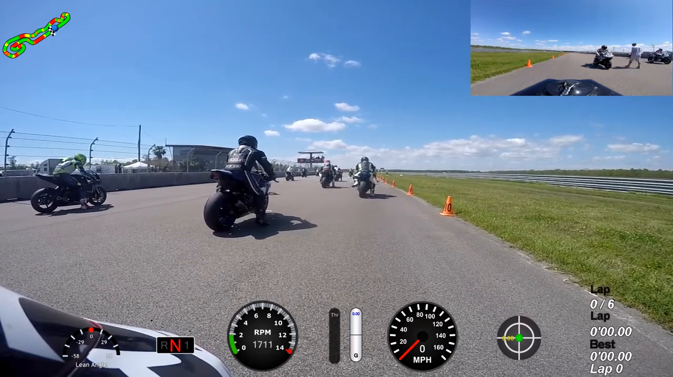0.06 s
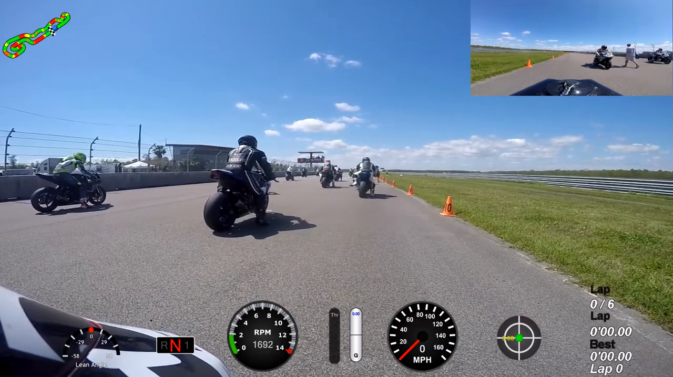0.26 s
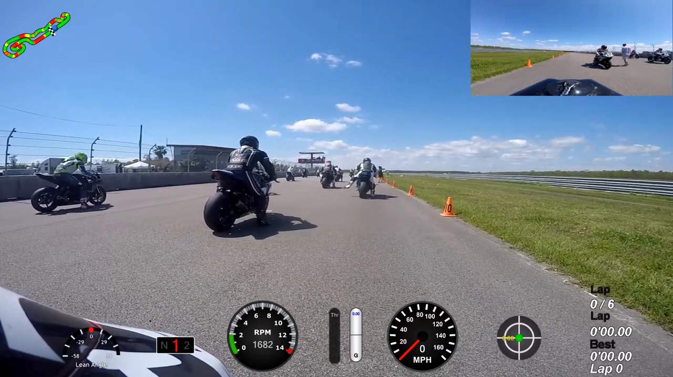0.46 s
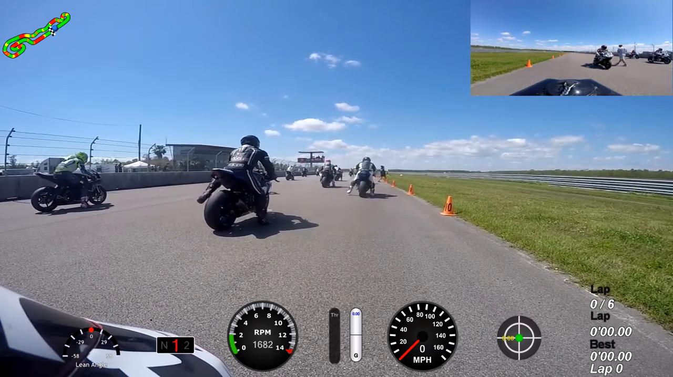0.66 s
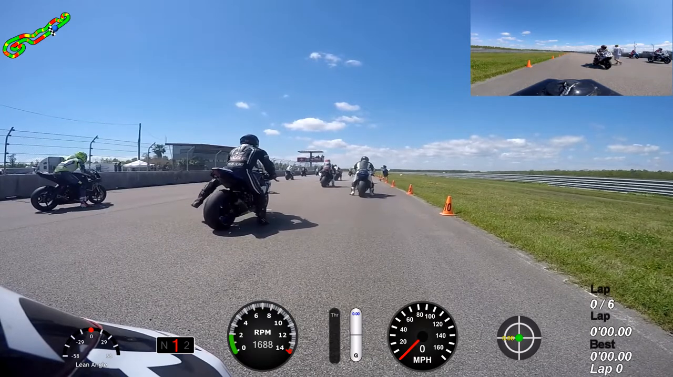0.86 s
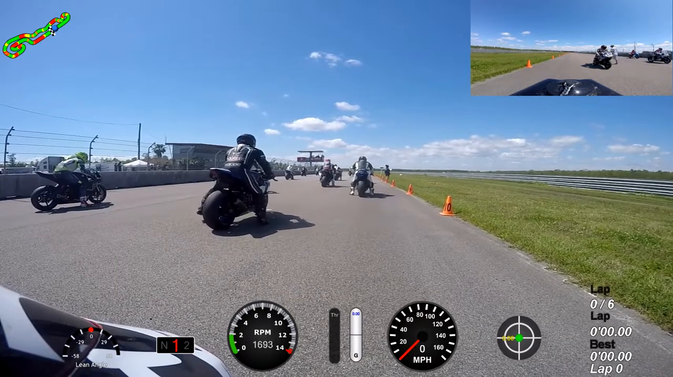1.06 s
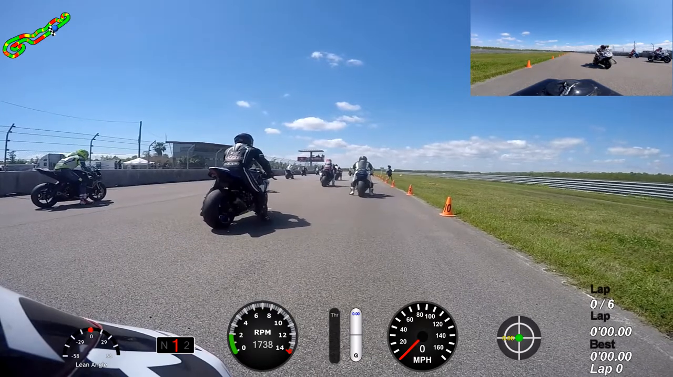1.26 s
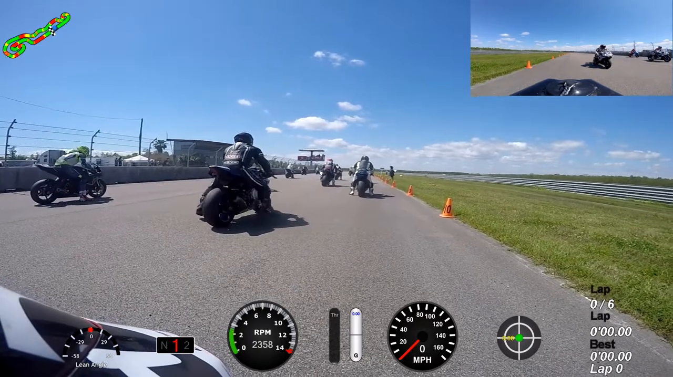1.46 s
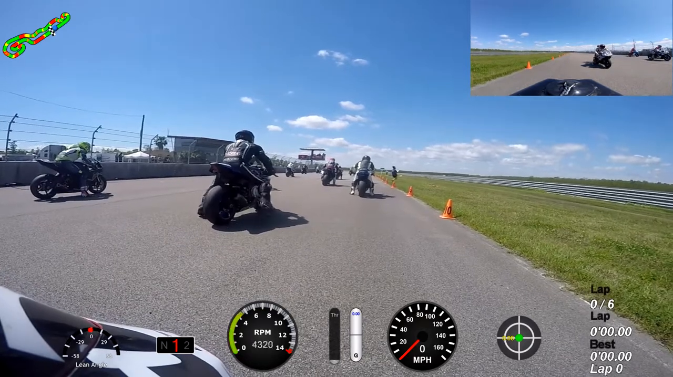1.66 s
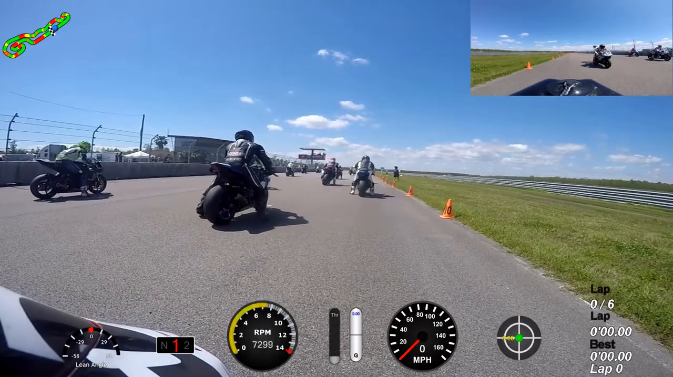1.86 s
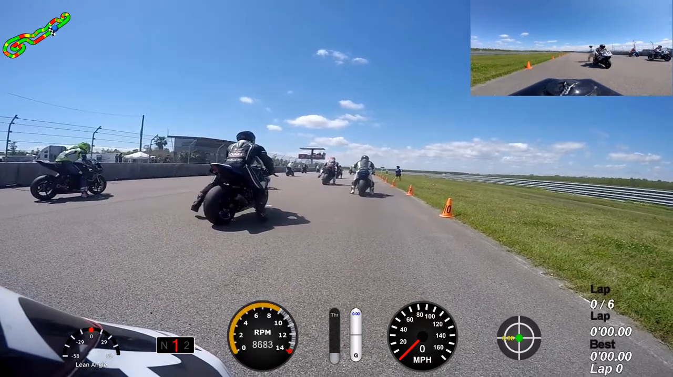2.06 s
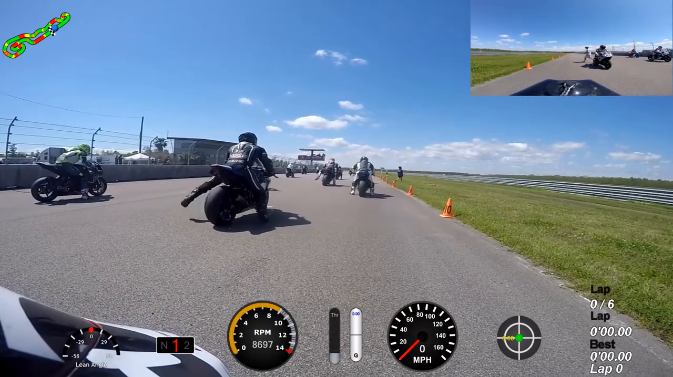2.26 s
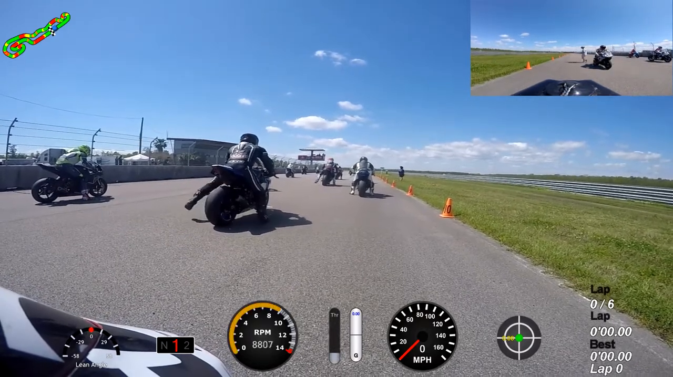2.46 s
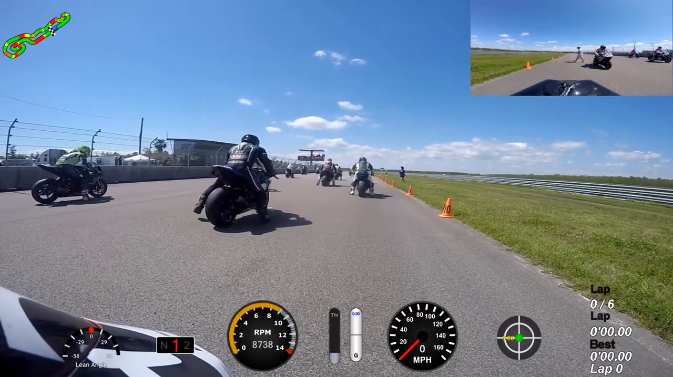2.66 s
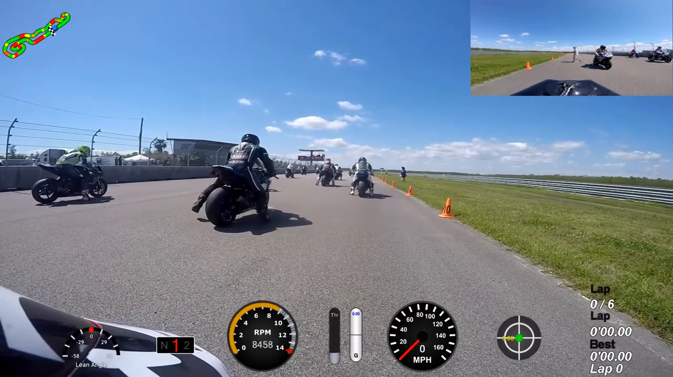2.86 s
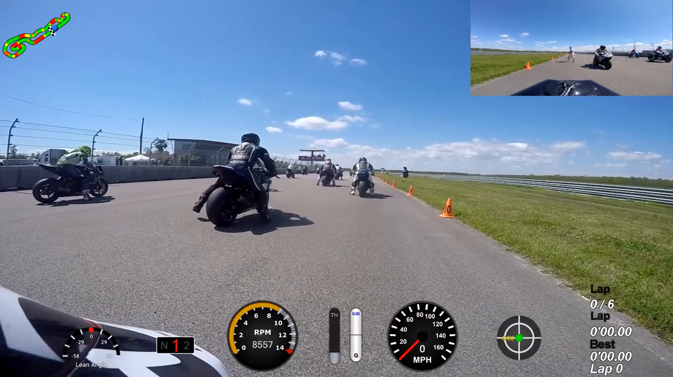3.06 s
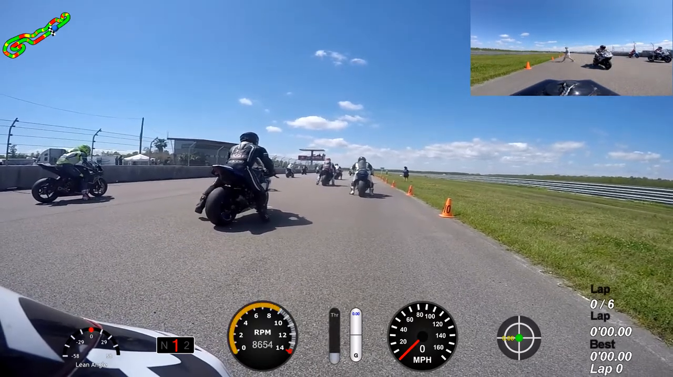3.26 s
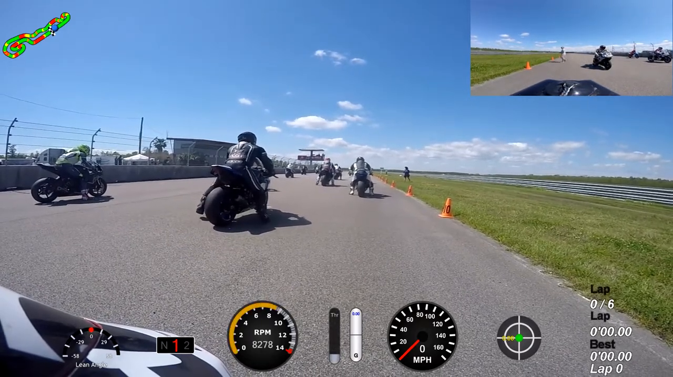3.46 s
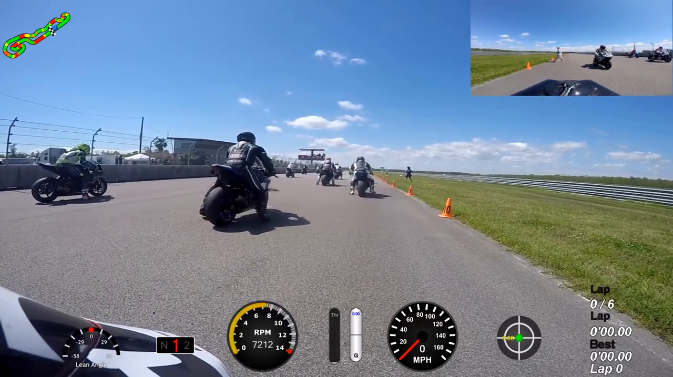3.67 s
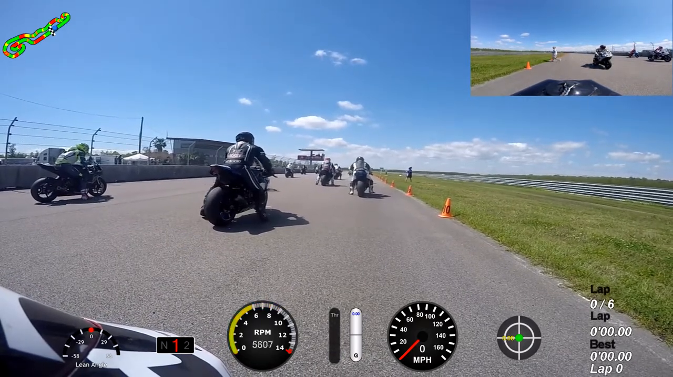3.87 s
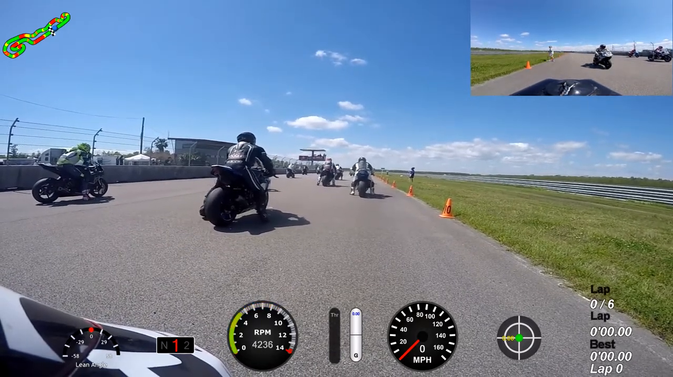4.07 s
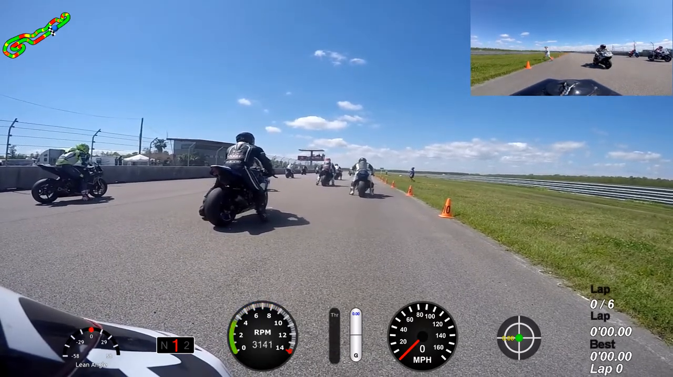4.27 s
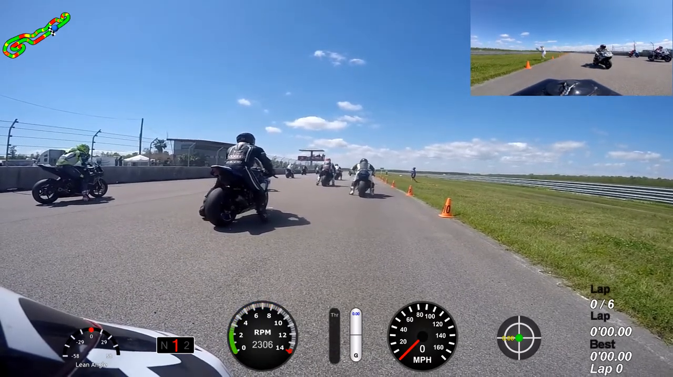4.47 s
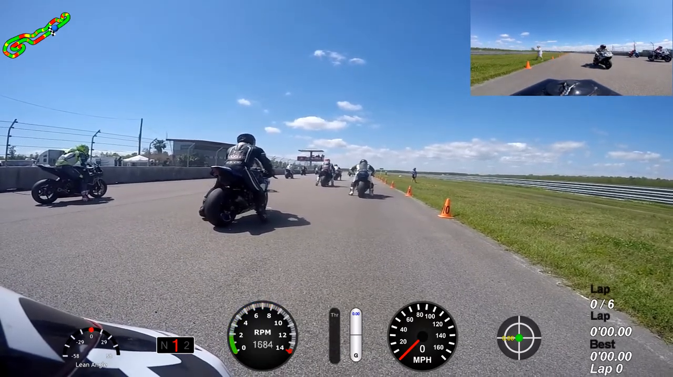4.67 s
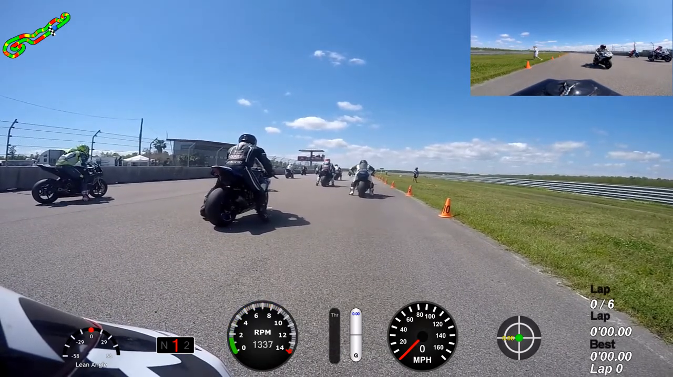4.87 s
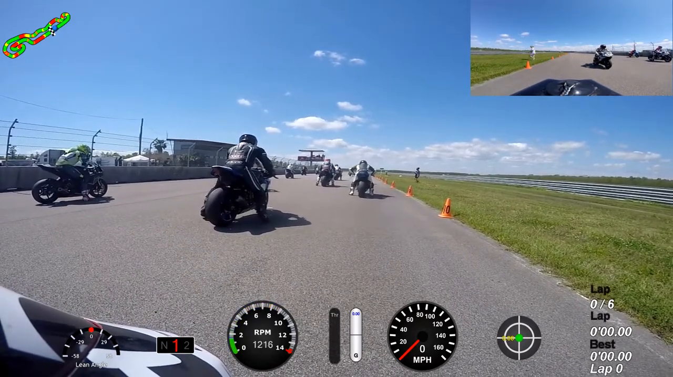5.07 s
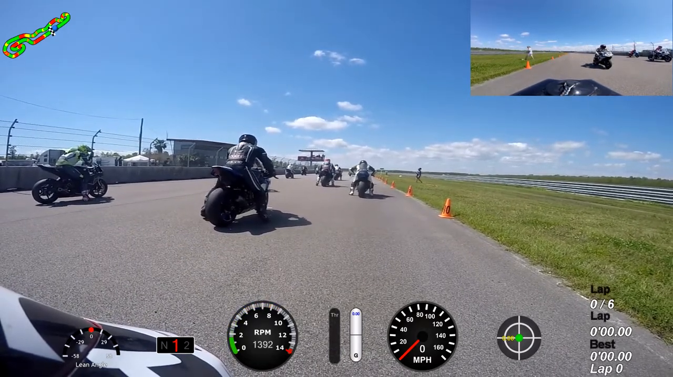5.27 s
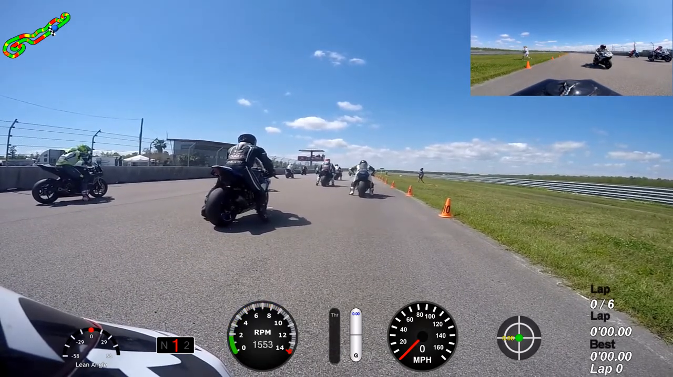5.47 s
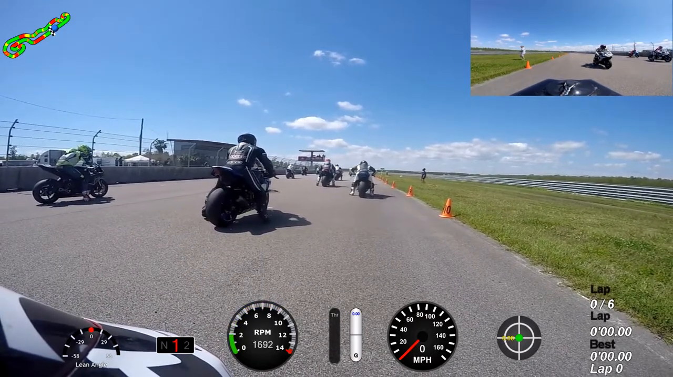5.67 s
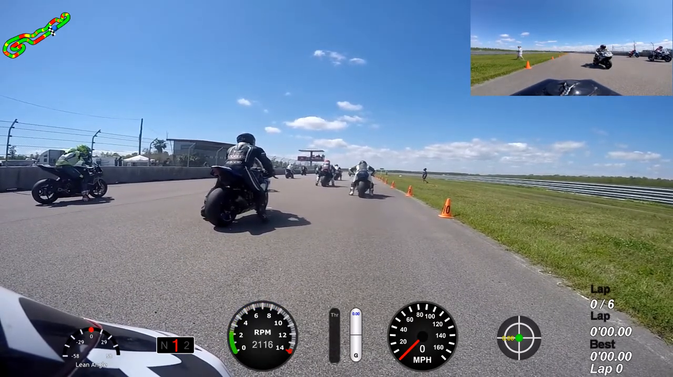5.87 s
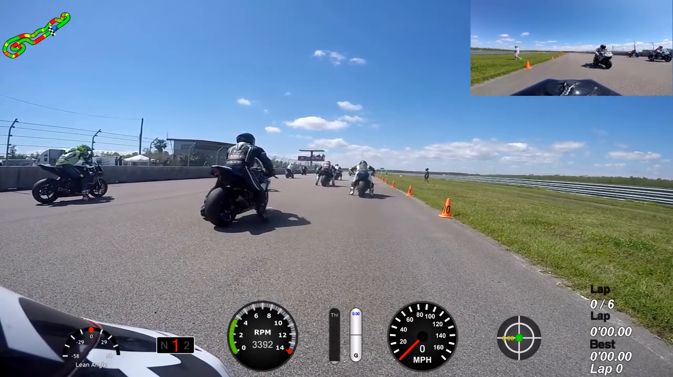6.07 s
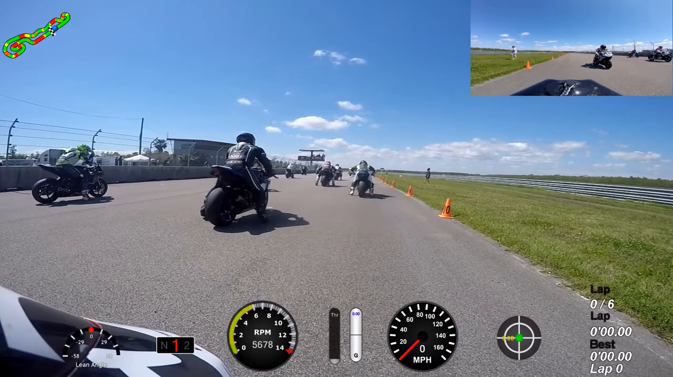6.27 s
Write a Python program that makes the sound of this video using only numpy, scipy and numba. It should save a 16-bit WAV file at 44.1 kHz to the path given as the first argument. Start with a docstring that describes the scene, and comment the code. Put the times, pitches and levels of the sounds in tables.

```python
"""A four-cylinder racing motorcycle on a starting grid, heard by a camera on the bike.
It idles, throbbing against the engines alongside, and clunks into gear; levers and fairing click.
At 1.7 s it revs up, each firing a bark from the pipe. From 2.25 s a limiter cuts and relights the
cylinders while a loose panel buzzes and unburnt charge pops. From 3.8 s it coasts down; one neighbour
revs and holds, another blips the throttle. At 5.3 s the bike is opened again."""
import sys
import numpy as np
from scipy import signal
from scipy.io import wavfile
from scipy.ndimage import uniform_filter1d
from numba import njit

SR = 44100
rng = np.random.default_rng(int(sys.argv[2]) if len(sys.argv) > 2 else 0)


def generate_wav(signal):
    """Clip the signal to [-1, 1] and save it as 16-bit WAV at the path in sys.argv[1]."""
    frames = np.transpose(np.atleast_2d(signal))
    scaled = np.clip(frames, -1, 1) * 32767
    pcm = np.round(scaled).astype(np.int16)
    wavfile.write(sys.argv[1], SR, pcm)


N = 278712

# The bed of idling engines. Each row: time in seconds, level in dB.
GRID_LEVEL = [(0, -17.5), (.45, -16), (.65, -20.5), (1.3, -19), (1.6, -16), (1.9, -17), (2.2, -24.5),
              (3.0, -26.5), (3.4, -22), (3.8, -25), (4.1, -33), (4.7, -26), (5.0, -19.5), (5.3, -22),
              (5.7, -16.5), (6.32, -13)]
# Three idles in that bed. Each entry: firing rate in Hz.
GRID_FIRING_HZ = [43.2, 65.78, 34.79]
# Their exhaust resonances. Each row: centre in Hz, width in Hz, gain in dB.
GRID_PIPE_MODES = [(56.6, 66, 3), (116, 106, -3), (179, 129, 3), (278, 117, -3), (373, 170, -9)]
# A neighbour's wandering idle. Each row: time in seconds, nominal pitch in Hz, relative level in dB.
WANDERING_IDLE = [(0, 195.8, -38), (.17, 165.7, -19.5), (.39, 174.7, -16.5), (.45, 191.8, -22),
                  (.75, 169.4, -24.5), (.92, 200, -21), (1.11, 178.1, -24), (1.2, 208, -16.5),
                  (1.37, 172.6, -27), (1.49, 176.4, -15), (1.56, 208.6, -19.5), (1.7, 217, -42)]
# A neighbour revs and holds. Each row: time in seconds, firing rate in Hz, relative level in dB.
HELD_REV = [(4.2, 105.2, -45), (4.4, 120.7, -46), (4.65, 137.4, -42.5), (4.9, 141.8, -46.5),
            (5.5, 143.7, -40), (6.32, 145.2, -40)]
# Its harmonics. Each row: multiple of the firing rate, gain in dB.
HELD_HARMONICS = [(2, -22), (3, 6.5), (4, 1.5), (5, -1), (6, -3.5)]
# A neighbour's throttle blip. Each row: time in seconds, firing rate in Hz, relative level in dB.
THROTTLE_BLIP = [(4.85, 83.8, -38), (4.974, 127.4, -27), (5.046, 147.3, -32), (5.184, 133.3, -18),
                 (5.342, 103.8, -31), (5.4, 96.4, -44)]
# Gear clunks and lever clicks. Each row: start in seconds, relative level in dB,
# ring time in seconds, thud offset in dB.
CLUNKS = [(.3252, -26, .004, -6), (.3580, -21, .045, 6), (.3920, -25, .045, 9), (.4698, -30, .05, 10),
          (.6755, -33, .02, 2), (.8790, -17, .003, -14), (1.3090, -27, .015, 0), (1.322, -29, .015, 0),
          (1.6140, -30, .004, -10), (1.6540, -24, .015, 6), (1.6625, -13, .03, -4), (1.7073, -30, .02, 0),
          (1.7230, -29, .01, -6), (4.1317, -34, .02, -6), (4.682, -30, .015, 0), (5.1267, -21, .03, -4)]
# Glove or lever scrapes. Each row: centre in seconds, half-width in seconds, relative level in dB.
GLOVE_SCRAPES = [(1.305, .03, -40), (4.675, .025, -39)]
# Bangs in the pipe. Each row: start in seconds, relative level in dB.
BACKFIRES = [(2.077, -12), (2.632, -6), (3.182, -10), (3.293, -7), (3.583, -8), (3.8, -12), (3.826, -13)]
# The bike's rev curve. Each row: time in seconds, firing rate in Hz, base levels of harmonics 1-3 in dB.
REVS = [(0, 57, -17.5, -64, -63), (.45, 55.8, -13, -62, -62), (1.5, 56, -12, -62, -65),
        (1.65, 57.5, -20, -60, -60), (1.7, 66.4, -12, -37, -45), (1.778, 97.6, -9, -41, -14),
        (1.874, 134, -9, -17, -24), (1.986, 180.3, -12.5, -16.5, -34), (2.018, 198.6, -33, -56, -48),
        (2.092, 248, -12, -20, -22), (2.19, 302, -16.5, -56, -42), (2.25, 295, -15.5, -63, -60),
        (3.0, 288, -15.5, -67, -58), (3.8, 280, -16.5, -60, -55), (3.95, 236, -17, -50, -40),
        (4.144, 181.3, -20, -36.5, -47), (4.372, 130.3, -25, -26, -69), (4.68, 81, -30.5, -29, -30.5),
        (4.866, 60.5, -28, -42, -42), (5.1, 45, -24, -40, -27), (5.33, 42.3, -24, -32, -31),
        (5.6, 49.2, -9.5, -34, -23), (5.85, 54.4, -15.5, -30, -29), (6.11, 61.5, -24.5, -26, -48),
        (6.25, 84.5, -10.5, -47, -21.5), (6.32, 95.3, -25, -39, -27)]
# Cylinder balance, in firing order. Each entry: gain in dB.
CYLINDER_BALANCE = [0, -1.0, -2.0, -1.0]
# In-between tones of uneven firing. Each row: multiple of the firing rate, dB against the firing tone.
MISFIRE_TONES = [(.5, -18), (1.5, -17)]
# The low tone's throb. Each row: crest time in seconds, crest gain in dB, following dip in dB.
THROB_CRESTS = [(.034, 7, -13), (.224, 6.5, -11), (.35, 1, -4), (.55, -3.5, -9), (.768, -1, -2.5),
                (.917, -1.5, -26), (1.082, -1, -21), (1.268, -1.5, -10), (1.476, -1, -20), (1.61, -3, -18),
                (5.598, -2.5, -11), (5.692, 4, -4), (5.759, 4, -3), (5.838, 4, 0.5)]
# The limiter lets all four cylinders fire. Each row: start in seconds, end in seconds,
# strength as a factor, stumble of the tone at the end in dB.
LIMITER_RELIGHTS = [(2.35, 2.388, 1.16, -7), (2.513, 2.556, 1.12, -6), (2.619, 2.668, 0.63, -3),
                    (2.734, 2.776, 0.91, 1), (2.847, 2.886, 1.05, -1), (2.944, 2.979, .6, -4),
                    (3.056, 3.102, 1.43, -3), (3.164, 3.214, 1.29, -4), (3.29, 3.323, .8, -8),
                    (3.408, 3.47, 1.3, -5), (3.554, 3.6, 1.18, -7), (3.68, 3.73, 1.35, -9),
                    (3.798, 3.831, 0.69, -8)]
# The exhaust's level ride. Each row: time in seconds, base bark level in dB, base gas level in dB.
EXHAUST_LEVELS = [(0, -35.5, -49.5), (.33, -39, -50.5), (.4, -27.5, -47), (.66, -39.5, -54),
                  (1.19, -35, -52), (1.57, -29, -48.5), (1.76, -36, -50), (2.04, -31, -50.5),
                  (2.2, -23.5, -49), (2.4, -21, -42), (2.85, -21.5, -44.5), (3.2, -27, -44.5),
                  (3.75, -26, -41), (3.92, -32, -44.5), (4.05, -39, -52.5), (4.55, -37.5, -57),
                  (4.75, -34.5, -50), (5.27, -33.5, -50), (5.7, -31, -45), (6.32, -27, -41.5)]
# Surges of roar. Each row: peak time in seconds, build-up in seconds, bark lift in dB, gas lift in dB.
ROAR_SWELLS = [(.68, 0.027, 8.5, 5), (.84, .12, 13, 0), (1.319, 0.15, 13, 8), (1.655, 0.0076, 12.5, -2),
               (1.821, .06, 8, 4), (1.99, 0.15, 12.5, 3.5), (2.108, 0.055, 10, 10), (4.68, 0.12, 9, 10),
               (5.13, .02, 10, 9), (5.6, .06, 8, 2), (6.19, 0.12, 5, 1.5)]
# Resonances of pipe, tail pipe and fairing. Each row: centre in Hz, width in Hz, gain in dB.
PIPE_MODES = [(348.4, 96, 12.5), (607, 328, 6.5), (908, 684, -1), (1256, 1000, -5), (2040, 1060, -12.5),
              (2920, 4500, -30.5)]
TAILPIPE_MODES = [(458, 54, -33), (912, 36, 28)]
FAIRING_MODES = [(4650, 1560, 5), (8250, 2100, -13), (2570, 3500, 14), (13900, 12000, -4)]
# A loose panel at high revs. Each row: time in seconds, base level in dB.
PANEL_LEVEL = [(1.9, -52), (2.2, -50), (2.3, -42), (2.8, -41.5), (3.0, -50), (3.3, -51), (3.45, -78),
               (3.9, -80)]

CUT_FROM_S, CUT_TO_S = 2.25, 4.1  # the limiter cuts every second cylinder, except during relights
CUT_PULSE = -.3  # a cut cylinder only sucks back a weak inverted pulse
LIMIT_HZ, LIMIT_SWING_HZ = 288, 12.  # firing rate on the limiter; its sag and jump at strength 1
t = np.arange(N) / SR


def undb(db):
    return 10 ** (np.asarray(db) / 20)


def unit(x):
    return x / np.sqrt(np.mean(x ** 2))


def curve(rows):
    """Each column of (seconds, value, ..) rows as an automation curve."""
    times, *columns = np.transpose(rows)
    return [np.interp(t, times, column) for column in columns]


def decay(start, ring_s):
    """An instant attack that falls 60 dB in ring_s."""
    return (t >= start) * np.exp(-np.log(1000) * np.maximum(t - start, 0) / ring_s)


def butter(x, order, hz, kind="low"):
    return signal.sosfilt(signal.butter(order, hz, kind, fs=SR, output="sos"), x)


@njit
def bandpass(x, hz, width):
    """State-variable band-pass, gain 1 at the centre."""
    y, band, low = np.empty(len(x)), 0., 0.
    g, damping = np.tan(np.pi * hz / SR), width / hz
    for i in range(len(x)):
        v = (band + g * (x[i] - low)) / (1 + g * (g + damping))
        band, low, y[i] = 2 * v - band, low + 2 * g * v, damping * v
    return y


def ring(x, modes):
    """Parallel resonances, each applied twice, alternate ones inverted so no notch falls between."""
    return sum((-1) ** k * undb(db) * bandpass(bandpass(x, hz, width), hz, width)
               for k, (hz, width, db) in enumerate(modes))


def steady(x, span_s=.04):
    """Divides out the slow level, so that firing rate does not set loudness."""
    span = int(span_s * SR)
    return x / np.sqrt(uniform_filter1d(uniform_filter1d(x ** 2, span), span) + 1e-12)


def firings(hz, scatter_db, jitter, pattern_db, cut=np.zeros(N, bool)):
    """One pulse a firing, each with its own strength and timing; also the running count of firings."""
    turns = np.cumsum(hz) / SR
    at = np.flatnonzero(np.diff(np.floor(turns)))
    chance = rng.standard_normal((4000, 2))[:len(at)]
    strength = undb(scatter_db * chance[:, 0] + np.resize(pattern_db, len(at)))
    strength *= np.where(cut[at] & (np.arange(len(at)) % 2 == 1), CUT_PULSE, 1)
    delay = (jitter * chance[:, 1] * SR / hz[at]).astype(int)
    pulses = np.zeros(N)
    np.add.at(pulses, np.clip(at + delay, 0, N - 1), strength)
    return pulses, turns


def grid_rumble():
    """Three lumpy idles and their exhaust roar blur into a low bed."""
    pulses = sum(firings(np.full(N, hz), scatter_db=2.5, jitter=.0716, pattern_db=[0])[0]
                 for hz in GRID_FIRING_HZ)
    lumps = unit(ring(pulses, GRID_PIPE_MODES))
    roar = unit(ring(rng.standard_normal(N), GRID_PIPE_MODES))
    return unit(lumps + 1.2 * roar) * undb(curve(GRID_LEVEL)[0])


def neighbour(rows, harmonics, fade_s=.044):
    """An engine further off: only its strongest harmonics carry, each fluttering."""
    hz, db = curve(rows)
    turns = np.cumsum(hz) / SR
    gate = np.clip(np.minimum(t - rows[0][0], rows[-1][0] + fade_s - t) / fade_s, 0, 1)
    tones = 0
    for k, gain_db in harmonics:
        flutter_db = np.interp(t / .04, np.arange(200), rng.standard_normal(200))
        tones += undb(gain_db + flutter_db) * np.sin(2 * np.pi * k * turns)
    return np.sqrt(2) * tones * undb(db) * gate


def handling():
    """Clicks are a sharp edge with a metallic tail and a duller thud; scrapes are bursts of grit."""
    edge, bright, dull, scrape = np.zeros((4, N))
    for start, db, ring_s, thud_db in CLUNKS:
        tail = decay(start, max(ring_s, .003))
        edge[int(start * SR)] = 1.5 * undb(db)
        bright += undb(db) * tail
        dull += undb(db + thud_db) * tail ** .6  # the thud outlasts the click
    for centre, half_width, db in GLOVE_SCRAPES:
        scrape += undb(db) * np.exp(-((t - centre) / half_width) ** 2)
    noise = rng.standard_normal((3, N))
    grit = unit(noise[2] * undb(3.5 * rng.exponential(size=N)))
    metal_modes = [(1220, 920, 10), (2850, 810, -17), (4780, 1600, -1), (7250, 1300, -11),
                   (12250, 6400, -27)]
    metal = ring(1.45 * bright * noise[0] + 4.27 * scrape * grit, metal_modes)
    thud = ring(dull * noise[1], [(243, 740, 4.3), (660, 840, .61)])
    return edge + metal + 4.5 * thud


def backfires(ring_s=.031):
    """Unburnt charge pops: ragged bangs that ring the pipe with a low thump."""
    bursts = sum(undb(db) * decay(start, ring_s) for start, db in BACKFIRES)
    return 2.35 * ring(bursts * rng.standard_normal(N), PIPE_MODES + [(116, 630, 5.4)])


def panel_buzz(puff, swing):
    """Gas puffs shake a loose panel into a thin buzz that pumps with the limiter."""
    buzz = ring((.56 + puff) ** 2 * rng.standard_normal(N), [(6320, 790, -.15), (6560, 1930, -.85)])
    db, = curve([(1.8, -80), *PANEL_LEVEL, (4.1, -80)])
    return undb(db + 2.5 * swing) * steady(buzz)


def throb(gap_s=.12):
    """The low tone's gain as it throbs against nearby engines: round crests, narrow dips between."""
    gain = np.ones(N)
    crests, crest_db, dip_db = np.transpose(THROB_CRESTS)
    for start, following, db in zip(crests, [*crests[1:], np.inf], dip_db):
        end = following if following - start < 3 * gap_s else start + gap_s
        inside = (t >= start) & (t < end)
        angle = np.pi * (t[inside] - start) / (end - start)
        gain[inside] = np.hypot(np.cos(angle), undb(db) * np.sin(angle))
    near_crest = np.clip(2 - np.min(np.abs(t[:, None] - crests), axis=1) / gap_s, 0, 1)
    return gain * undb(near_crest * np.interp(t, crests, crest_db))


def swells(fall_s=.032):
    """Extra bark and gas in dB: the roar climbs to each peak and breaks off."""
    return sum(np.outer(lifts_db, np.interp(t, [peak - build, peak, peak + fall_s], [0, 1, 0]))
               for peak, build, *lifts_db in ROAR_SWELLS)


def rev_limiter(stutter_db=1.5, stutter_s=.012):
    """Revs sag while two cylinders are cut and jump as they relight; the tone stumbles and stutters."""
    cut = (t > CUT_FROM_S) & (t < CUT_TO_S)
    saw, swing_points, stumble_db = [], [], 0
    for start, end, strength, db in LIMITER_RELIGHTS:
        cut &= (t < start) | (t > end)
        jump_hz = LIMIT_SWING_HZ * strength
        saw += [(start, LIMIT_HZ - jump_hz), (end, LIMIT_HZ + jump_hz)]
        # loudness swings up into each relight and collapses when the cut returns
        swing_points += [(start + .01, strength), (end, .2 * strength), (end + .014, -strength)]
        stumble_db += db * np.exp(-((t - end - .001) / .011) ** 2)
    first, last = saw[0][0], saw[-1][0]
    free_revs = [(s, hz) for s, hz, *_ in REVS if not first < s < last]
    hz, = curve(sorted(free_revs + saw))
    swing, = curve([(CUT_FROM_S, 0), *swing_points, (last + .1, 0)])
    held = np.interp(t, [CUT_FROM_S, first, last, CUT_TO_S], [0, 1, 1, 0])
    stutter = held * np.interp(t / stutter_s, np.arange(600), rng.standard_normal(600))
    return hz, cut, swing, .5 * swing + stumble_db + stutter_db * stutter


def firing_tones(turns, cut, limiter_db):
    """The engine's note: three clean harmonics, with tones between them while cylinders are cut."""
    times, _, *levels_db = np.transpose(REVS)
    first, second, third = curve(np.transpose([times, *undb(levels_db)]))
    first *= throb() * undb(limiter_db)
    uneven = first * uniform_filter1d(1. * cut, int(.015 * SR))
    partials = [(1, -first), (2, -second), (3, -third)]
    partials += [(k, uneven * undb(db)) for k, db in MISFIRE_TONES]
    return np.sqrt(2) * sum(gain * np.cos(2 * np.pi * k * turns) for k, gain in partials)


def pipe_bark(pulses, puff, sharpness):
    """Pressure fronts ring the tail pipe and crack, over a turbulent roar that leads at idle."""
    front = butter(butter(-pulses, 3, 950), 1, 300, "high")
    tailpipe = sum(undb(db) * bandpass(pulses, hz, width) for hz, width, db in TAILPIPE_MODES)
    crack = bandpass(bandpass(pulses, 2030, 700), 2030, 640)
    edge = unit(front) + .33 * unit(tailpipe) + .05 * unit(crack)
    roar = ring((1 + .53 * sharpness * puff) * rng.standard_normal(N), PIPE_MODES)
    return 1.1 * sharpness * steady(edge) + np.sqrt(1 - .68 * sharpness) * steady(roar)


def bike():
    """Four cylinders drive the note, the pipe's bark and gas puffs that shake fairing and panel."""
    hz, cut, swing, limiter_db = rev_limiter()
    pulses, turns = firings(hz, scatter_db=3.6, jitter=.045, pattern_db=CYLINDER_BALANCE, cut=cut)
    puff = steady(signal.lfilter([1], [1, -np.exp(-1 / (.0041 * SR))], np.maximum(pulses, 0)))
    sharpness = np.clip(hz / 250, 0, 1) ** 1.5  # the pressure front steepens with revs
    bark_db, gas_db = curve(EXHAUST_LEVELS)
    bark_lift_db, gas_lift_db = swells()
    bark = undb(bark_db + bark_lift_db + 3 * swing) * pipe_bark(pulses, puff, sharpness)
    gas_flow = .61 + (sharpness + .018 * gas_lift_db) * puff ** 1.2
    gas = steady(ring(gas_flow * rng.standard_normal(N), FAIRING_MODES))
    gas *= undb(gas_db + gas_lift_db + .5 * swing)
    return firing_tones(turns, cut, limiter_db) + bark + gas + panel_buzz(puff, swing)


def scene():
    """The grid behind, the bike up front, in mono."""
    background = grid_rumble() + neighbour(HELD_REV, HELD_HARMONICS)
    background += neighbour(THROTTLE_BLIP, [(1, 1), (2, -13), (3, -30)])
    background += neighbour(WANDERING_IDLE, [(.99, -1.5)])
    fade_in = np.clip(t / .004, 0, 1)
    return (fade_in * (background + bike() + backfires() + handling()))[None]


def record(dry, carrier_hz=12100, mirror_db=-21.5, top_hz=15700):
    """The camera mirrors the sound faintly around a treble carrier, rounds peaks and trims both ends."""
    mirror = butter(dry, 1, 1300, "high") * np.cos(2 * np.pi * carrier_hz * t)
    wet = butter(dry + undb(mirror_db) * mirror, 2, 32, "high")
    wet = np.tanh(.8 * wet) / .8
    return signal.sosfilt(signal.ellip(10, .2, 70, top_hz, fs=SR, output="sos"), wet)


dry = scene()
out = record(dry)
generate_wav(out)
```